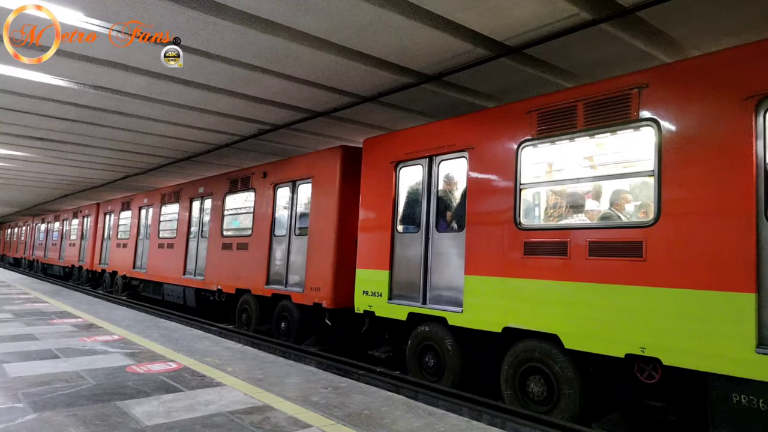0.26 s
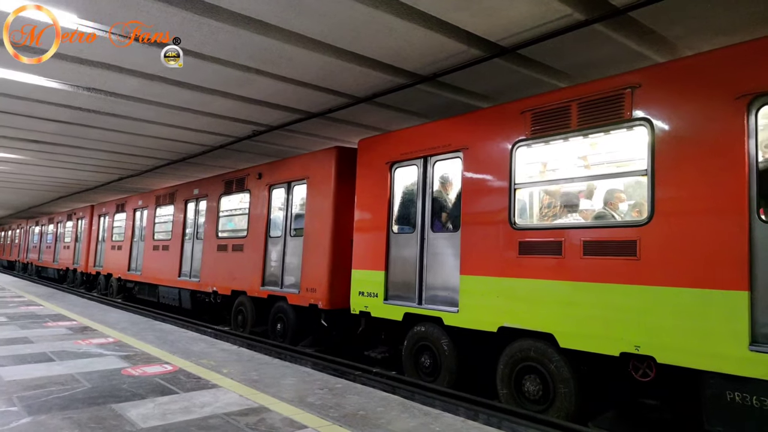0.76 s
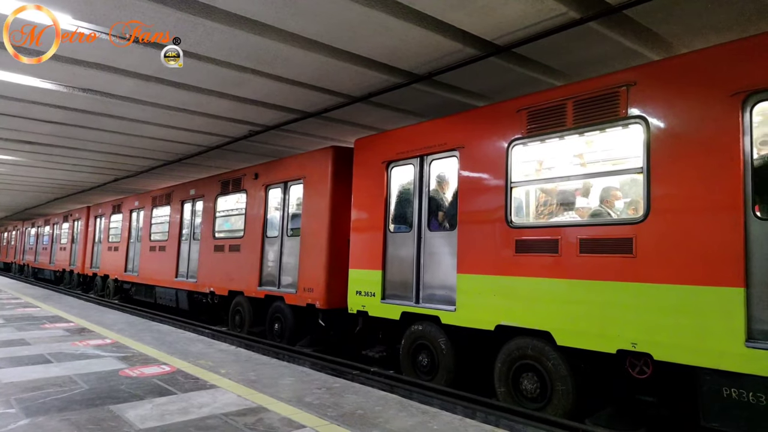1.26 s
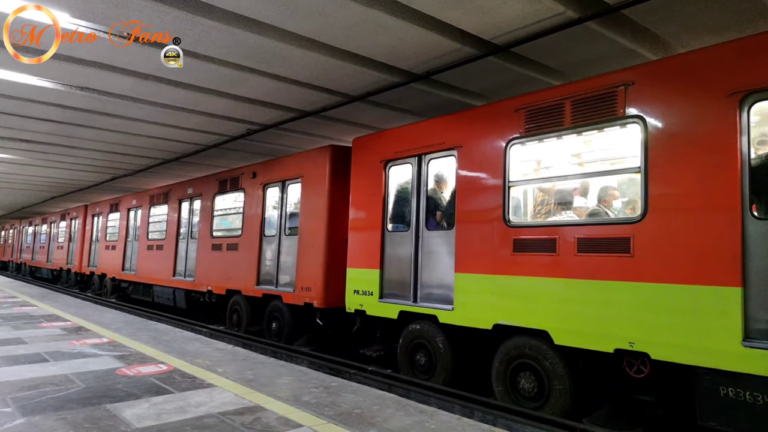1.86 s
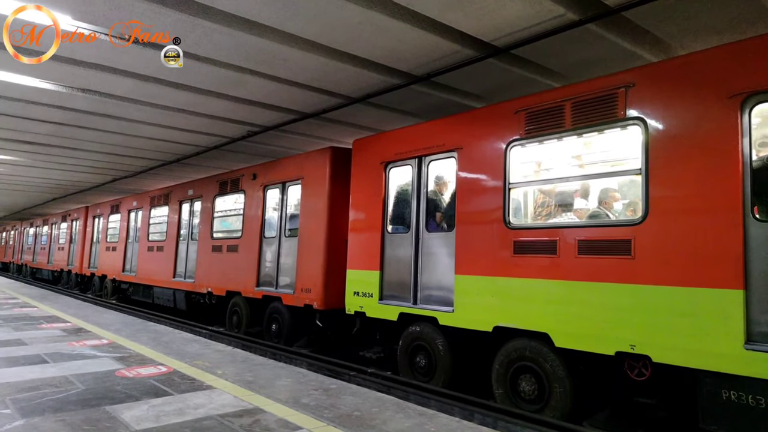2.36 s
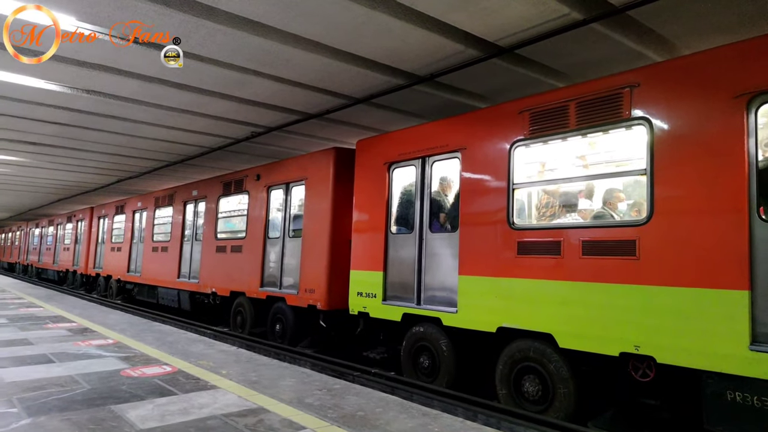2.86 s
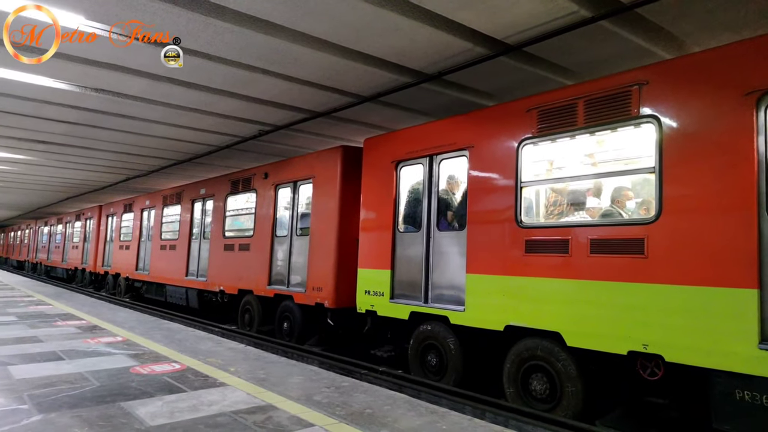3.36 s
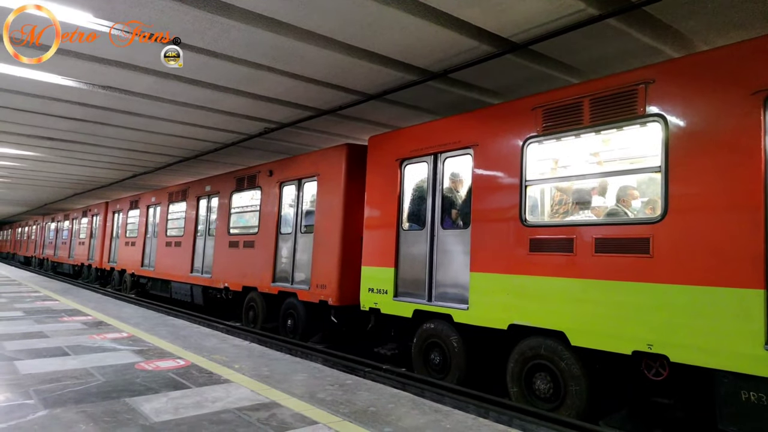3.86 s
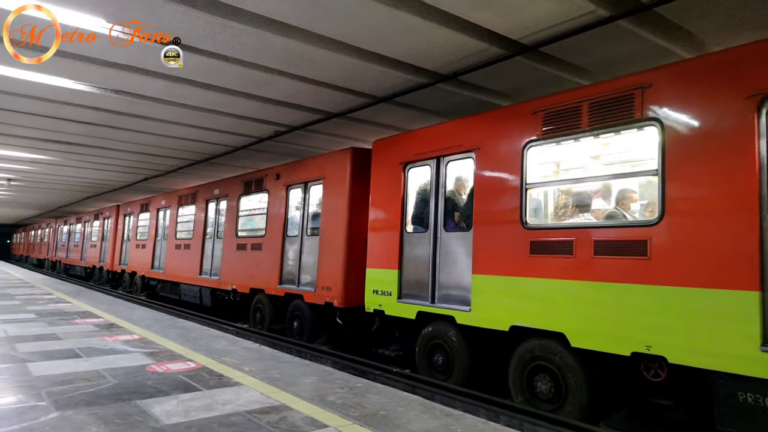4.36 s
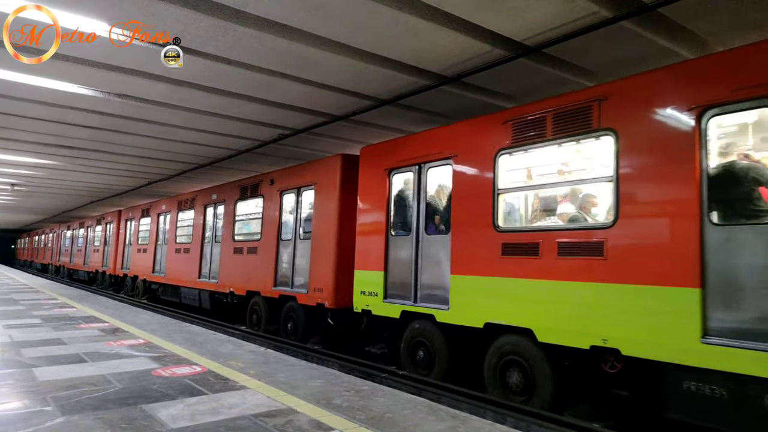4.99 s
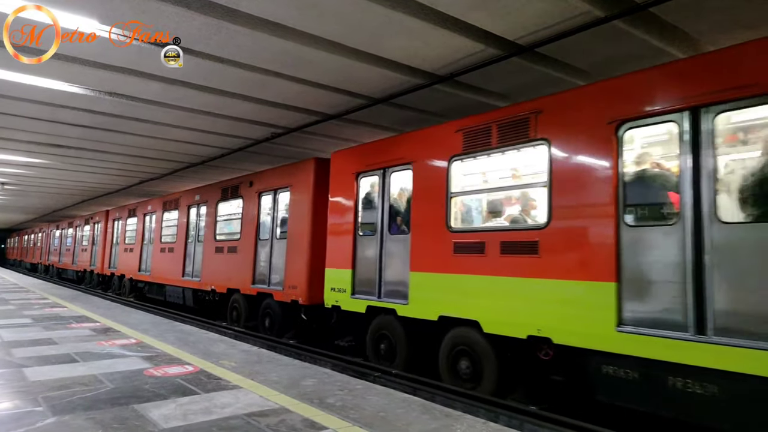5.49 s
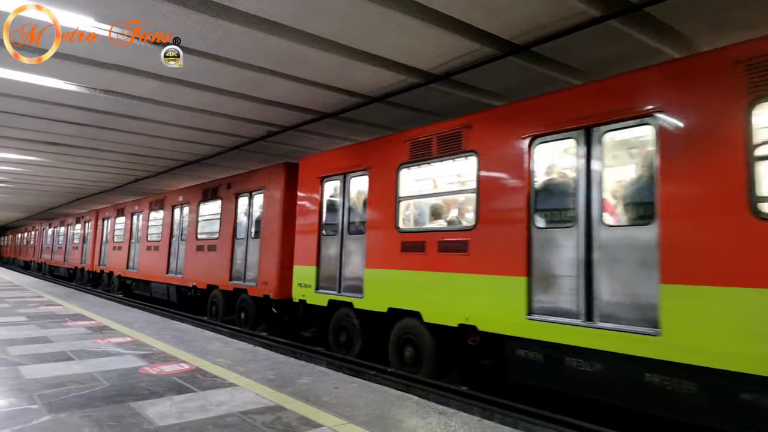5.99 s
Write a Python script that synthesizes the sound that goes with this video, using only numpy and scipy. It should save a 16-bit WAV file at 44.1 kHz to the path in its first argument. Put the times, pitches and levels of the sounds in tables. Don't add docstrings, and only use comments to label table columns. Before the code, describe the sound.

Steady electrical buzz and blowing fans from a waiting subway train, then motors sing louder and a tyre rush grows as it pulls out.

```python
import sys
import numpy as np
from scipy import signal
from scipy.fft import rfft, irfft, next_fast_len
from scipy.io import wavfile
from scipy.ndimage import uniform_filter1d

SR = 44100
rng = np.random.default_rng(int(sys.argv[2]) if len(sys.argv) > 2 else 0)


def amplitude_ratio(level_db):
    exponent = np.asarray(level_db, float) / 20
    return 10 ** exponent


def wrap_up_sound(samples):
    columns = np.atleast_2d(samples).T
    tamed = np.clip(columns, -1, 1)
    steps = np.round(tamed * 32767).astype(np.int16)
    wavfile.write(sys.argv[1], SR, steps)


N = 274743
T = np.arange(N) / SR
SIZE = next_fast_len(N)
HZ = np.arange(SIZE // 2 + 1) * SR / SIZE
RIPPLE_HZ = 120.77


def curves(table):
    s, *columns = np.transpose(table)
    return [np.interp(T, s, c) for c in columns]


def colour(points, hz):
    f, db = np.transpose(points)
    return amplitude_ratio(np.interp(np.log(hz + 1e-9), np.log(f), db))


def walk(steps):
    knots = rng.standard_normal(512)
    whole = steps.astype(int)
    ease = np.sin(np.pi / 2 * (steps - whole)) ** 2
    return knots[whole % 512] * (1 - ease) + knots[(whole + 1) % 512] * ease


def noise():
    return rfft(rng.standard_normal((2, SIZE)))


def dead_spots(spots, t):
    gain = np.ones(len(t), complex)
    for at, width, left in spots:
        x = (t - at) / width
        gain = gain * -(x + 1j * left) / np.sqrt(1 + x ** 2)
    return gain


def dead_spots_db(spots, t):
    return 20 * np.log10(abs(dead_spots(spots, t)))


def field(spectrum, arrivals, swell_db, flicker_db, tilt_db=0):
    alike = sum(share * np.exp(-2j * np.pi * HZ * lag / SR) for lag, share in arrivals)
    bass = 1 / (1 + (HZ / 149) ** 2)
    alike = alike + (1 - sum(share for lag, share in arrivals)) * bass
    alike = alike / np.maximum(abs(alike), 1) / (1 + (HZ / 9000) ** 4)
    right, other = noise() * colour(spectrum, HZ)
    left = (alike * right + np.sqrt(1 - abs(alike) ** 2) * other) * amplitude_ratio(2.5 * bass ** 2)
    both = np.array([left, right])
    out, swell = 0, walk(1.5 * T)
    place = 2 * np.log2(HZ / 20 + 1e-9)
    for band in range(20):
        share = np.cos(np.pi / 2 * np.clip(place - band, -1, 1))
        db = swell_db * (swell + walk(1.03 * T)) + flicker_db * walk(11 * T) + tilt_db * (band - 13) / 2
        out = out + amplitude_ratio(db) * irfft(both * share, SIZE)[:, :N]
    return out / np.sqrt(np.mean(out ** 2))


def tone(hz, db, lead):
    in_step_s = 0.2
    return np.sqrt(2) * amplitude_ratio(db) * np.sin(2 * np.pi * hz * (T - in_step_s) + np.array([[1], [0]]) * lead)


# pitch in Hz, gain in dB.
MIC = [(20, 1), (7700, 0.5), (8050, -5), (8250, -10), (9500, -5), (10150, -2), (10500, -5), (11400, -4.5),
       (12000, -4.5), (13600, -4.5), (13750, 3), (14050, -1), (14230, -5), (14400, -50)]


def phone_gain(hz):
    return colour(MIC, hz)


# pitch in Hz, level in dB, rise in dB per s, wander in dB,
# left minus right in dB, lead of the left port in radians.
FANS = [(220.38, -44, .2, .8, .1, -.4), (221.01, -44, .2, .8, .1, -.4), (354, -51, .1, 4, .1, -.4),
        (441, -53, 1.6, 1.5, .1, -.2), (708, -54, 0, 3, .1, -2.4), (884.2, -54, -.8, 1, -5, 1.7),
        (944.8, -58, .4, 2.5, 4, 3), (1062, -51, -1.3, 2, -2, 3), (1066, -51, -1.2, 2, 1, -.8),
        (1238.2, -55, -.6, 1.5, .1, -2)]
# pitch in Hz, level in dB.
AIR = [(20, -24), (32, -18), (55, -18), (85, -7.5), (125, -2.5), (190, -2), (270, -10), (400, -7.5),
       (600, -9), (780, -14), (950, -14.5), (1150, -18), (2000, -22.5), (3500, -29.5), (7700, -36.5),
       (8300, -40.5), (14500, -50)]
# time in s, change of level in dB.
AIR_SWELL = [(0, -0.25), (1, -0.3), (2, -1.33), (3, -0.59), (4, -0.4), (5, -0.43), (6.23, 0.061)]
STANDING = [(22, 0.17), (-12.5, 0.14), (17.5, 0.2), (-9, 0.11), (3, 0.16)]


def fans():
    flare_db = 8.5 * np.exp(-((T - 0.28) / 0.28) ** 2)
    blades = 0
    for hz, db, slope, wander_db, pan_db, lead in FANS:
        line_db = db + flare_db * (hz == 884.2) + slope * T + wander_db * walk(5 * T)
        ports_db = line_db + np.array([[pan_db], [-pan_db]]) / 2
        blades = blades + tone(hz, ports_db, lead + 0.47 * walk(3 * T))
    air_db = -29 + curves(AIR_SWELL)[0]
    return blades + amplitude_ratio(air_db) * field(AIR, STANDING, swell_db=0.0, flicker_db=1.14)


# offset from their common pitch in Hz, level in dB, rise in dB per s.
SHAFT = [(-1.1, -52, 1.6), (1.125, -47, -1.3)]


def shaft():
    common_hz, in_step_s = 28.3, 0.43
    pair = 0
    for off, db, slope in SHAFT:
        turning = np.exp(2j * np.pi * off * (T - in_step_s))
        pair = pair + amplitude_ratio(db + slope * T + .8 * walk(1.55 * T)) * turning
    ports = amplitude_ratio(np.array([[3.5], [-4.5]])) * np.exp(1j * np.array([[-1.3], [0]]))
    throb = np.imag(ports * pair * np.exp(2j * np.pi * common_hz * T))
    return np.sqrt(2) * throb * (1 + 0.41 * walk(9 * T))


# pitch in Hz, level in dB.
BRAKE = [(800, -24), (2000, -1), (4000, 2), (8000, 5), (14500, -13)]


def brake_air():
    hiss = irfft(noise() * colour(BRAKE, HZ), SIZE)[:, :N]
    hiss = hiss / np.sqrt(np.mean(hiss ** 2))
    puff, tail = amplitude_ratio(-34.5 - 60 * T / 0.19), amplitude_ratio(-42.0 - 60 * T / 1.0)
    return hiss * (puff + tail)


# pitch in Hz, level in dB.
TYRES = [(150, -12), (300, 0.5), (500, -2), (800, -2.5), (1100, -3), (1600, -0.5), (2500, -1.5),
         (3300, -7.5), (4300, -11.5), (5000, -8.5), (7400, -16), (14500, -30)]
# time in s, level in dB, tilt in dB per octave.
ROLLING = [
    (0, -78, 4),
    (3.9, -59, -7),
    (4.3, -47, .5),
    (4.6, -39.5, 1),
    (5, -36, -0.1),
    (5.2, -34, -0.1),
    (5.35, -31.5, -0.4),
    (5.6, -31, -.2),
    (5.9, -29.5, 0),
    (6.23, -27.5, -0.5),
]
MOVING = [(21, 0.14), (-19, 0.088), (11.5, 0.11), (-4, 0.055), (1.5, 0.082)]


def tyres():
    db, tilt_db = curves(ROLLING)
    return amplitude_ratio(db) * field(TYRES, MOVING, swell_db=-0.02, flicker_db=1.4, tilt_db=tilt_db + 0.82)


# multiple of the ripple, level in dB after the phone's colour, left minus right in dB,
# lead of the left port in radians.
BUZZ = [(1, -41, 1, -0.6), (10, -58, 5, -3.0), (11, -59, -3, -3.1), (13, -55, 10, -2.8), (14, -55, 3, -3.0),
        (20, -54, 7, -2.4), (21, -58, 3, 0.2), (22, -53, -11, -2.2), (23, -60, -2, 0.8),
        (25, -52, -2, -1.1), (26, -62, 4, 1.6), (27, -62, 0, 2.8), (28, -62, -2, -0.2), (30, -52, -2, -0.0),
        (31, -62, -11, -2.4), (36, -49.5, -6, 1.9), (39, -61, 1, -0.2), (41, -63, 9, 2.3),
        (42, -55.5, -1, -1.0), (47, -63, 1, -0.1), (48, -66, -3, -1.8), (51, -65, -3, -2.2),
        (54, -66, 3, -0.0), (59, -63, -1, 0.0), (60, -63, -3, -0.1), (72, -74, -6, -1.7),
        (84, -65.5, -1, 0.9), (114, -74, 1, 1.8), (115, -77, -2, -3.1), (116, -79, 1, 1.3)]
BUZZ_FAINT = [(15, -63, -1, 2.8), (19, -66, -3, -2.6), (29, -73, -10, -1.7), (32, -71, 2, 0.1),
              (33, -71, 8, -2.4), (34, -76, 3, -0.6), (35, -70, -4, 1.9), (37, -73, 9, 2.6),
              (38, -68, 2, -2.5), (40, -73, -7, 2.3), (43, -69, 0, -2.9), (44, -70, -7, -1.2),
              (45, -70, 0, -2.2), (46, -75, 3, 3.1), (49, -68, 6, 2.4), (50, -68, 9, -1.4),
              (52, -66, -8, 0.0), (53, -76, -7, 2.1), (55, -73, -1, -0.3), (56, -74, -3, 0.9),
              (57, -68, 2, 1.3), (58, -74, 2, 0.3), (61, -72, -1, -0.7), (62, -69, 5, -0.1),
              (63, -68, -1, 0.8)]
BUZZ_TREBLE = [(64, -77, -4, -0.1), (65, -81, -3, 1.4), (66, -74, -2, -0.2), (69, -85, -4, -3.0),
               (71, -80, 0, 3.0), (73, -89, 0, -0.1), (74, -87, 0, 0.0), (75, -85, 0, -3.0),
               (76, -84, -3, -2.8), (78, -81, 1, 0.0), (79, -87, -1, 1.5), (80, -84, 1, -3.0),
               (82, -85, -1, 3.1), (83, -77, -4, 2.5), (85, -82, 1, 2.2), (90, -82, 0, -0.7),
               (91, -89, -1, -0.0), (92, -86, 2, 0.1), (93, -78, -3, 2.9), (94, -80, 2, 1.0),
               (97, -82, -2, 1.4), (99, -86, 0, -2.7), (100, -86, -1, 3.0), (102, -81, 0, -3.0),
               (103, -83, 1, -3.0), (104, -89, 0, 2.7), (105, -78, -1, -0.8), (106, -89, 0, -0.0),
               (108, -81, 0, 3.0), (109, -89, -1, 3.0), (110, -90, 0, 2.8), (111, -85, 0, -0.4),
               (112, -85, 0, -0.0), (117, -84, -1, 3.0)]
# time in s, change of level in dB, speed 0-1.
LEAVING = [
    (0, -0.5, 0.12),
    (3.9, 1, 0.26),
    (4.3, -0.5, 0.34),
    (5, 1, 0.64),
    (6.23, 3.5, 1.07),
]
SWAY = {"25": (1.2, 1.5), "30": (1.6, 1.6), "36": (2.2, 2.9), "42": (2.1, .9), "22": (1, 4.5),
        "84": (1.1, 1.5), "60": (2.5, 2.7)}
BUZZ_DEAD_SPOTS = {"25": [(4.35, .15, .4), (5.6, 0.3, 0.3)], "30": [(4.42, 0.051, .2), (4.78, 0.069, .5),
                   (5.44, .07, .1), (5.62, .08, .2), (5.95, .08, .3)], "36": [(4.45, 0.24, .1),
                   (5.45, .15, .2), (6.1, .3, .2)], "42": [(4.5, 0.14, .3), (4.82, .08, .3),
                   (5.5, 0.16, .3)], "84": [(3.7, 0.24, 0.4)], "22": [(4.6, 0.13, .3), (5.3, .1, .4),
                   (5.9, .2, .5)], "60": [(4.75, .2, .2), (5.6, .4, .2)]}
PORT_DEAD_SPOTS = {"25 left": [(3.85, .35, 0.6)], "25 right": [(5.3, 0.57, 0.2)],
                   "36 right": [(5.1, 0.44, .3), (5.8, .4, .25)], "30 right": [(4.72, .1, .25),
                   (5.3, .06, .2)], "42 right": [(3.6, 0.52, 0.2)]}


def converter():
    away_db, speed = curves(LEAVING)
    travel = np.cumsum(speed)[::64] * 9 / SR
    coarse, away_db, speed = T[::64], away_db[::64], speed[::64]
    out = np.zeros((2, N))
    for k, db, pan_db, lead in [*BUZZ, *BUZZ_FAINT, *BUZZ_TREBLE]:
        k = int(k)
        hz, start = k * RIPPLE_HZ, rng.uniform(0, 2 * np.pi)
        gain = amplitude_ratio(db) / phone_gain(hz)
        fade_db = away_db * min(1, k / 30)
        unrest_db = .7 + 4 * speed
        if k >= 72:
            fade_db = fade_db + 0.5 * (db < -76) + np.interp(coarse, (3.9, 4.9), (0, -8))
        if str(k) in SWAY:
            sway_db, loudest = SWAY[str(k)]
            fade_db = fade_db + sway_db * np.cos(2 * np.pi * (coarse - loudest) / 3.35)
            fade_db = fade_db + dead_spots_db(BUZZ_DEAD_SPOTS[str(k)], coarse)
            unrest_db = .7 + 2 * speed ** 2
        shares = np.sqrt(2 / (1 + amplitude_ratio(np.array([-2 * pan_db, 2 * pan_db]))))
        for port, shift, share, side in zip(out, (lead, 0), shares, (" left", " right")):
            shade_db = dead_spots_db(PORT_DEAD_SPOTS.get(str(k) + side, []), coarse)
            drift_db = np.interp(T, coarse, fade_db + shade_db + unrest_db * walk(travel))
            drift = np.interp(T, coarse, (.04 + speed) * walk(travel))
            wave = np.sin(2 * np.pi * hz * T + start + shift + drift)
            port += gain * share * amplitude_ratio(drift_db) * wave
    return np.sqrt(2) * out


TRACTION = {"12": (-55, -40, 2.02, -1.13, 20.5, 15.5, 2.0), "18": (-63, -68.5, 1.15, 2.5, 33, 24.5, 1.0),
            "24": (-59.5, -61, 2.5, 2.54, 14.5, 8.5, 1.34)}
# time in s, share of full load 0-1.
LOAD = [(4.05, 0), (4.3, 0.37), (4.6, 0.78), (4.9, 1), (5.04, 0.76), (5.2, 1.05), (5.33, 0.59), (5.55, 0.7),
        (5.7, 0.34), (6.0, 0.66), (6.23, .35)]
DEAD_SPOTS = {"12 left": [(5.1, 0.48, 0), (5.37, 0.074, 0.2), (5.67, 0.034, -0.39), (5.92, 0.03, 0),
              (6.06, 0.06, 0.4)], "12 right": [(4.84, 0.32, 0.02), (5.45, 0.1, 0), (6.05, 0.03, 0.41)],
              "18 left": [(4.5, 0.07, 0.56), (4.58, 0.19, -0.13), (4.89, 0.45, 0.04), (5.12, 0.14, 0.3),
              (5.34, 0.45, 0.13), (5.65, 0.03, 0.65)], "18 right": [(4.98, 0.43, 0.15), (5.64, 0.03, 0.11),
              (5.89, 0.15, -0.28), (6.23, 0.03, -0.01)], "24 left": [(4.93, 0.45, 0.16), (5.13, 0.098, 0.2),
              (5.45, 0.19, 0.34), (5.64, 0.05, 0.3), (6.08, 0.07, 0.04)], "24 right": [(4.6, 0.06, 0.05),
              (4.67, 0.036, 0.34), (4.89, 0.083, 0.16), (5.16, 0.056, -0.09), (5.92, 0.058, 0.27)]}


def traction():
    load, out = curves(LOAD)[0], np.zeros((2, N))
    travel = 6 * np.cumsum(curves(LEAVING)[1]) / SR
    for name, (*levels, lead) in TRACTION.items():
        standing_db, creep_db, load_db = np.reshape(levels, (3, 2, 1))
        db = standing_db + creep_db * np.minimum(T, 4.2) + load_db * load
        db = db + 0.37 * np.array([walk(travel), walk(travel)])
        left = dead_spots(DEAD_SPOTS[name + " left"], T) * np.exp(1j * (lead + 0.05 * walk(travel)))
        right = dead_spots(DEAD_SPOTS[name + " right"], T)
        turning = np.exp(2j * np.pi * int(name) * RIPPLE_HZ * T)
        out += np.sqrt(2) * amplitude_ratio(db) * np.imag(np.array([left, right]) * turning)
    return out


def scene():
    return fans() + shaft() + brake_air() + tyres() + converter() + traction()


def patchy(x, depth_db, from_hz):
    hz, _, z = signal.stft(x, SR, nperseg=1024)
    chance = rng.standard_normal(z[:1].shape)
    patches = uniform_filter1d(uniform_filter1d(chance, size=11), size=4, axis=1)
    patches = patches / patches.std() + .3 * chance[:1, :, :1]
    usual = abs(z).mean(axis=2, keepdims=True)
    faint = np.clip(2 - usual / uniform_filter1d(usual, size=9, axis=1), 0, 1)
    loud = uniform_filter1d(abs(z[:, hz > from_hz]).mean(axis=1, keepdims=True), size=20)
    faint = faint * (np.median(loud) / np.maximum(loud, np.median(loud))) ** .15
    depth_db = depth_db * faint * np.clip((hz[:, None] - from_hz) / 400, 0, 1)
    streaks = z * amplitude_ratio(depth_db * np.minimum(patches, .6))
    return signal.istft(streaks, SR, nperseg=1024)[1][:, :N]


def low_pass(x):
    return signal.sosfilt(signal.butter(12, 15130, fs=SR, output="sos"), x)


def record(dry):
    coloured = irfft(rfft(dry, SIZE) * phone_gain(HZ), SIZE)[:, :N]
    streaky = patchy(coloured, depth_db=11., from_hz=7600)
    return low_pass(streaky)


dry = scene()
out = record(dry)
wrap_up_sound(out)
```